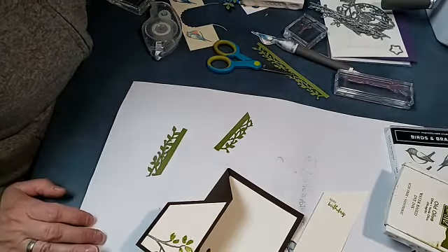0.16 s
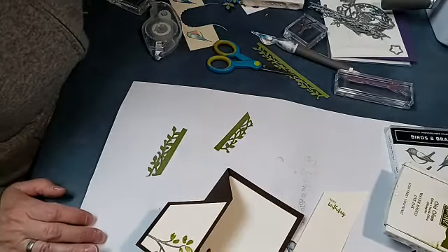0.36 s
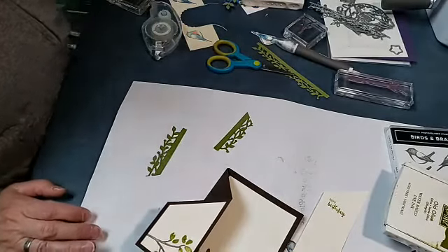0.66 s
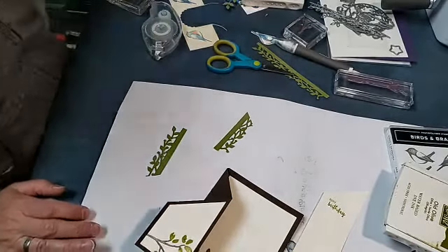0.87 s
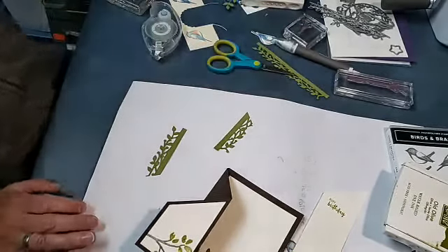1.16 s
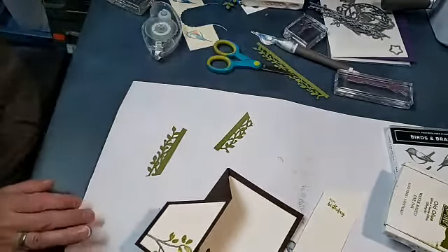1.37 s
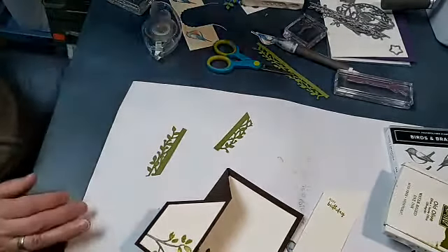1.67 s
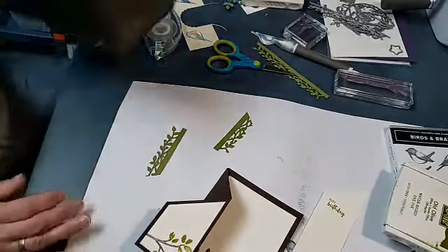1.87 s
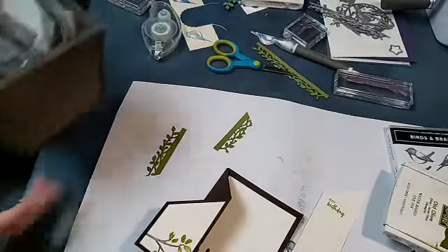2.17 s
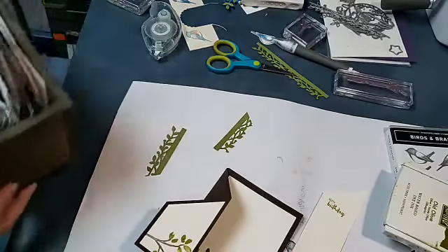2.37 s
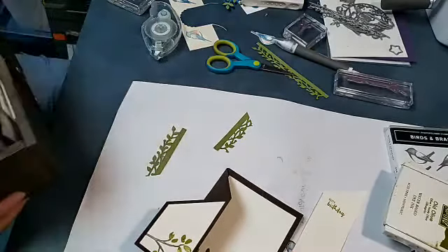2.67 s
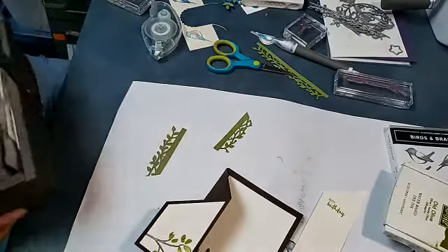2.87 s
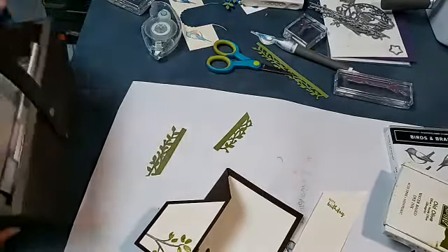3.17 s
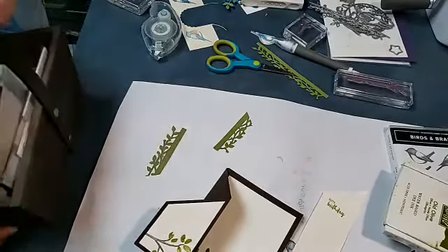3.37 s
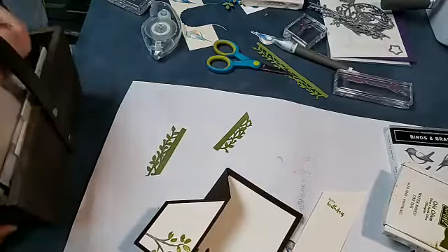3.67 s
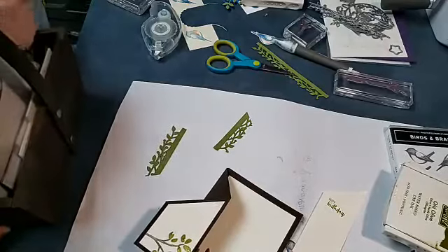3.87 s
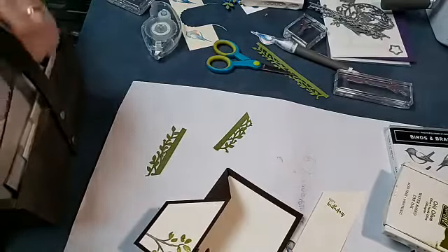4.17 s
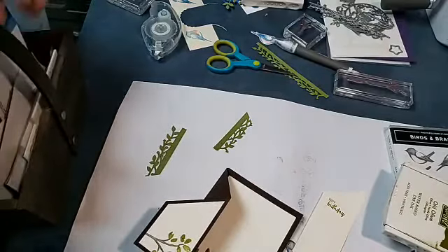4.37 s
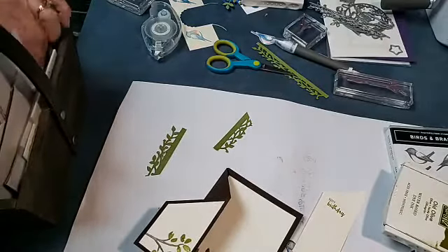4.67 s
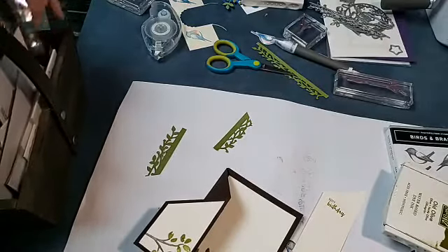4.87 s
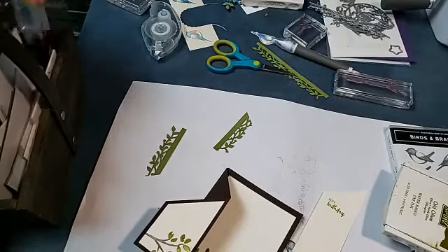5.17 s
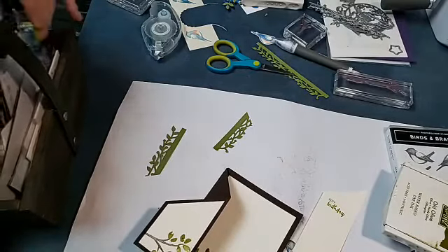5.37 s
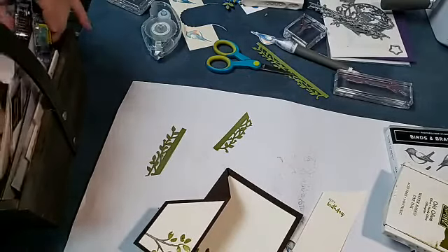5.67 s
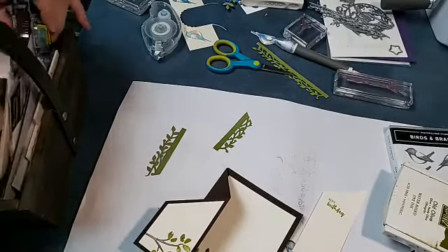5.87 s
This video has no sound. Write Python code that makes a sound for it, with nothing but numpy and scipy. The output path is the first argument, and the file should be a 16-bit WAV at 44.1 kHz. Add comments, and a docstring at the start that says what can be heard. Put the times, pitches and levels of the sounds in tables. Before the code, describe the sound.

In a quiet room, a drawer bangs closed, a handled box creaks and lands softly, and a hand sorts clicking plastic cases and rustling packets.

```python
"""Craft table in a small quiet room, one close microphone, over faint hiss and a low wavering rumble.
A drawer scrapes in and bumps shut; a storage box creaks, ticks at its handle and is set down with thuds.
A hand rummages in it: plastic clicks, knocks on the hollow box, rustling paper packets, dragged edges.
Blows are noise bursts plus damped sines, booms are single low modes with a brief rumble,
rustle is crackle over a smooth rub, scrapes are noise grains through resonances."""
import sys
import numpy as np
from scipy import signal
from scipy.fft import rfft, irfft, next_fast_len
from scipy.io import wavfile
from scipy.ndimage import map_coordinates

SR = 44100
rng = np.random.default_rng(int(sys.argv[2]) if len(sys.argv) > 2 else 0)


def master(y):
    """Save y as 16-bit WAV."""
    cut = np.clip(np.atleast_2d(y).T, -1, 1)
    pcm = np.round(cut * 32767)  # scale
    wavfile.write(sys.argv[1], SR, pcm.astype(np.int16))


N = 265702
TIME = np.arange(N) / SR


def amp(db):
    """Decibels to gain."""
    return 10 ** (np.asarray(db) / 20)


def unit(x):
    """Scale to an rms of one."""
    return x / np.sqrt(np.mean(x ** 2) + 1e-20)


def read(points, hz):
    """Interpolate a (Hz, value) table on a log-frequency axis."""
    table_hz, value = np.transpose(points)
    return np.interp(np.log(hz + 1), np.log(table_hz + 1), value)


def add(mix, start_s, sound):
    """Mix a sound in at a time."""
    part = mix[max(round(start_s * SR), 0):][:len(sound)]
    part += sound[:len(part)]


def colour(x, points, size=2048):
    """Minimum-phase filter with the given spectrum: attacks stay sharp."""
    log_gain = np.log(amp(read(points, abs(np.fft.fftfreq(size, 1 / SR)))))
    taps = np.fft.ifft(np.exp(np.conj(signal.hilbert(log_gain)))).real
    return signal.oaconvolve(x, taps[:size // 2])[:len(x)]


def registers(x):
    """Split into bass (170-1000 Hz), middle (1-5 kHz) and treble (above 5 kHz)."""
    size = next_fast_len(len(x) + SR // 20)
    hz = np.fft.rfftfreq(size, 1 / SR) + 1
    above_170, above_1000, above_5000 = (1 / (1 + (edge_hz / hz) ** 4) for edge_hz in (170, 1000, 5000))
    bands = np.array([above_170 - above_1000, above_1000 - above_5000, above_5000])
    return irfft(rfft(x, size) * bands, size)[:, :len(x)]


def register_levels(level_db, weight_db, sharp_db):
    """Gains of bass, middle, treble; weight and sharpness are relative to the middle."""
    return amp(level_db + np.array([weight_db, 0, sharp_db]))


def resonate(x, hz, width_hz):
    """Resonance of gain one; its frequency may follow a curve."""
    turn = np.exp(2j * np.pi * np.cumsum(hz * np.ones(len(x))) / SR)
    pole = np.exp(-np.pi * width_hz / SR)
    return 2 * (turn * signal.lfilter([1 - pole], [1, -pole], x / turn)).real


def resonate_twice(x, hz, width_hz):
    """Two equal resonances in series: steeper skirts."""
    return resonate(resonate(x, hz, width_hz), hz, width_hz)


def ring(modes, t, detune):
    """Damped sines, randomly detuned: each blow lands elsewhere."""
    shift, phase = rng.standard_normal(len(modes)), rng.random(len(modes))
    return sum(amp(db - 60 * t / t60_s) * np.sin(2 * np.pi * (hz * (1 + detune * k) * t + p))
               for (hz, db, t60_s), k, p in zip(modes, shift, phase))


def blows(rows, modes, spectrum, t60_s, alike, ring_db, crack_db, crack_s, rise_s, detune):
    """Each blow: a brief crack, a decaying wash of dense modes, and a few ringing modes."""
    out, t = np.zeros(N), np.arange(SR // 4) / SR
    head = slice(SR // 100)  # levels refer to the first 10 ms
    fade = amp(-60 * t / t60_s) + amp(crack_db) * np.exp(-t / crack_s)
    onset = 1 - np.exp(-t / rise_s)
    # alike: 0 = every blow differs, 1 = all identical
    shared_noise, shared_tones = rng.standard_normal(len(t)), ring(modes, t, detune)
    for start_s, level_db, weight_db, sharp_db in rows:
        noise = np.sqrt(alike) * shared_noise + np.sqrt(1 - alike) * rng.standard_normal(len(t))
        dense = colour(noise * fade, spectrum)
        tones = alike * shared_tones + (1 - alike) * ring(modes, t, detune)
        hit = (dense / dense[head].std() + amp(ring_db) * tones / tones[head].std()) * onset
        # heavy contact brings out the bass, hard contact the treble
        parts = registers(hit)
        gains = register_levels(level_db, weight_db, sharp_db) / parts[:, head].std(axis=1)
        add(out, start_s, gains @ parts)
    return out


def slips(rows, weight_db, sharp_db, brighten):
    """Rows for blows from one joint: weaker is duller, by brighten dB of treble per dB of level."""
    hardest_db = max(level_db for start_s, level_db in rows)
    return [(start_s, level_db, weight_db, sharp_db + brighten * (level_db - hardest_db))
            for start_s, level_db in rows]


def low_modes(rows, cycles, slope, rise_s, clatter_db, clatter_t60_s):
    """A struck panel's low mode swells and dies, over a brief rumble of its neighbours."""
    out, t = np.zeros(N), np.arange(SR // 2) / SR
    onset = np.sin(np.pi / 2 * np.minimum(t / rise_s, 1)) ** 2
    for start_s, peak_db, hz in rows:
        t60_s = cycles * (hz / 100) ** slope / hz  # cycles: t60 in periods at 100 Hz
        mode = amp(-60 * np.maximum(t - rise_s, 0) / t60_s) * np.sin(2 * np.pi * hz * t)
        rumble = unit(resonate_twice(rng.standard_normal(len(t)), hz, hz))
        clatter = rumble * amp(clatter_db - 60 * t / min(clatter_t60_s, 2 * t60_s))
        add(out, start_s, amp(peak_db) * onset * (mode + clatter))
    return out


# still-room hiss, relative spectrum: hz [Hz], density_db [dB per Hz]
HISS_SPECTRUM = [(20, -13), (45, -12.5), (65, -17.5), (110, -11), (250, -24), (500, -39.5), (2000, -38),
                 (4000, -43), (7500, -48.5), (10000, -49.5), (12000, -38.5)]
HISS_DB = -70.5
RUMBLE_HZ, RUMBLE_WIDTH_HZ, RUMBLE_DB = 59.5, 22, -61


def air():
    """Faint hiss plus narrow-band noise: the room's wavering rumble."""
    hz = np.fft.rfftfreq(N, 1 / SR)
    hiss = irfft(rfft(rng.standard_normal(N)) * amp(read(HISS_SPECTRUM, hz)), N)
    rumble = irfft(rfft(rng.standard_normal(N)) / (1 + ((hz - RUMBLE_HZ) / RUMBLE_WIDTH_HZ) ** 4), N)
    return amp(HISS_DB) * unit(hiss) + amp(RUMBLE_DB) * unit(rumble)


STROKE_RISE_SHARE = 0.46  # share of the length spent swelling
STROKE_FADE_DB, STROKE_ROUNDNESS = 17, 1.56  # drop at both ends; 1 = pointed top


def swell(peak_s, length_s):
    """One hand movement: builds up, fades a little more slowly."""
    rising, falling = (peak_s - TIME) / STROKE_RISE_SHARE, (TIME - peak_s) / (1 - STROKE_RISE_SHARE)
    away = np.maximum(rising, falling) / length_s
    return amp(-STROKE_FADE_DB * np.minimum(away, 10) ** STROKE_ROUNDNESS)


# hand strokes over paper and packets:
# peak_s [s], length_s [s], level_db [dB at 1-5 kHz], weight_db [dB], sharp_db [dB]
PAPER_STROKES = [(0.032, 0.18, -52, -7, 0), (0.169, 0.039, -57, 6, 4), (0.263, 0.35, -58.5, 0, -1),
                 (0.698, 0.27, -60.5, 3.5, -4), (2.313, 0.2, -76, -16.5, 9.5), (2.68, 0.18, -70, -4.5, 9),
                 (2.848, 0.11, -73, -19, 8.5), (3.045, 0.13, -69.5, -14.5, 0), (3.129, 0.068, -60, -12, 3),
                 (3.367, 0.088, -49, -3, -3), (3.443, 0.27, -58, 1.5, -7.5), (3.519, 0.058, -49, -1, -6.5),
                 (3.639, 0.15, -61.5, -2, 6.5), (3.735, 0.15, -53, -2.5, 4.5), (3.82, 0.24, -49.5, 1.5, -8),
                 (3.938, 0.12, -42, -3.5, -4), (4.05, 0.15, -62, -4.5, -4), (4.181, 0.23, -65.5, -8, 11),
                 (4.245, 0.19, -57.5, 3, -9.5), (4.609, 0.18, -54.5, -3, -5), (4.673, 0.05, -52.5, -6, 5.5),
                 (4.793, 0.17, -42, -5, -7.5), (5.0, 0.36, -69.5, -24.5, 2), (5.293, 0.12, -63, -9.5, 4),
                 (5.392, 0.15, -53.5, -6, -7), (5.602, 0.45, -63.5, 3.5, -6),
                 (5.69, 0.098, -48.5, -2, -6.5)]
HELD_FROM_S, HELD_DB, HELD_SHARP_DB = 2.2, -88, 9  # contents stir faintly once the box is lifted


def effort():
    """Bass, middle and treble levels: stroke powers add over the faint stir."""
    power = np.outer(register_levels(HELD_DB, 0, HELD_SHARP_DB) ** 2, TIME > HELD_FROM_S)
    for peak_s, length_s, level_db, weight_db, sharp_db in PAPER_STROKES:
        stroke_power = register_levels(level_db, weight_db, sharp_db) ** 2
        power += np.outer(stroke_power, swell(peak_s, length_s) ** 2)
    return np.sqrt(power)


# paper snap and rub, relative spectrum: hz [Hz], density_db [dB per Hz]
PAPER_SPECTRUM = [(100, 6), (330, -9), (520, -3), (900, -6), (1600, -2.5), (3100, -8), (4100, -6.5),
                  (6000, -8), (10000, -13.5), (15000, -8.5)]
# ringing modes of the hollow box: hz [Hz], level_db [dB], t60_s [s]
BOX_RINGS = [(469.2, -1, .07), (555.2, -0.5, 0.11), (798, -6, 0.1), (1127, 5.5, 0.035), (1573, 0.5, 0.062),
             (1803, 1, 0.038), (2100, -2.5, 0.051), (2750, -23.5, .06), (3650, -6, 0.011)]


def crackle(slips_per_s=750, spread_db=4.0, clump_db=7, clump_s=.025, snap_t60_s=0.026,
            box_db=-10, detune=.07, edges=14):
    """Packet edges slip in clumps; each has its own snap and rings the box a little."""
    out, t, knots = np.zeros(N), TIME[:SR // 12], np.arange(1024)
    for _ in range(edges):
        clumps = amp(clump_db * np.clip(rng.standard_normal(len(knots)), -2, 2))
        busy = np.interp(TIME / clump_s, knots, clumps)
        slipping = rng.random(N) < busy / busy.mean() * slips_per_s / edges / SR
        sizes = amp(spread_db * np.minimum(rng.exponential(1, N), 3)) * rng.choice([-1, 1], N)
        snap = colour(rng.standard_normal(len(t)) * amp(-60 * t / snap_t60_s), PAPER_SPECTRUM)
        edge = unit(snap) + amp(box_db) * unit(ring(BOX_RINGS, t, detune))
        out += signal.oaconvolve(slipping * sizes, edge)[:N]
    return unit(out)


def shifting(x, patchy_db=4, patch_s=.022, even_hz=4500, count=48):
    """Resonances come and go as the things touched change; in the treble they even out."""
    hz, t, z = signal.stft(x, SR, nperseg=256)
    band = np.log1p(hz / 1000) / np.log1p(hz[-1] / 1000) * count
    grid = np.meshgrid(band, t / patch_s, indexing="ij")
    random_map = rng.standard_normal((count + 1, 1024))
    patches = unit(map_coordinates(random_map, grid, order=1, mode="nearest"))
    gain = amp(patchy_db * patches / np.hypot(1, hz / even_hz)[:, None])
    level_gain = gain / np.sqrt(np.mean(gain ** 2, axis=0))
    return signal.istft(z * level_gain, SR, nperseg=256)[1][:N]


def rustle(rub_db=-9):
    """Crackle over a smooth rub, each register following the hand's effort."""
    rub = unit(colour(rng.standard_normal(N), PAPER_SPECTRUM))
    parts = registers(shifting(crackle() + amp(rub_db) * rub))
    return sum(unit(part) * level for part, level in zip(parts, effort()))


# plastic cases touching: start_s [s], level_db [dB at 1-5 kHz], sharp_db [dB]
CASE_CLICKS = [(0.0535, -38, -5), (0.067, -60, -21), (0.158, -52, 8), (0.163, -40.5, 8), (0.173, -49.5, 3),
               (3.451, -52.5, -26), (3.903, -40.5, -2.5), (3.924, -43.5, 1), (3.934, -36, -1),
               (3.942, -36.5, -9), (3.96, -43, -4), (4.133, -53, -16), (4.275, -50.5, -13),
               (4.339, -62, -22), (4.513, -56.5, 17), (4.6279, -37, 1.5), (4.665, -46, -2),
               (4.7241, -42, -6.5), (4.9335, -53.5, -4.5), (4.979, -56.5, -7), (5.015, -55.5, -8),
               (5.0397, -55, -2.5), (5.304, -54.5, -5), (5.3323, -50, 0), (5.3468, -41.5, 1.5),
               (5.667, -38.5, -5.5)]
# ringing modes: hz [Hz], level_db [dB], t60_s [s]
CASE_RINGS = [(520, -2.5, .04), (1086, -2.5, 0.0243), (1585, -5, 0.047), (1940, -9, 0.057),
              (2214, -1.5, 0.0425), (2850, -0.5, 0.043), (4450, -2.5, 0.018), (4260, 10, 0.02),
              (5890, 2, 0.041)]
# dense damped modes, relative spectrum: hz [Hz], density_db [dB per Hz]
CASE_SPECTRUM = [(120, -39), (200, -6.5), (538, -9.5), (806, -24), (1250, -15.5), (1650, -5), (3560, -6.5),
                 (4200, -2.5), (6400, -12), (6880, 0), (9750, -6.5), (14900, -1.5), (16000, 0.5)]


def plastic_clicks(weight_db=-16.5):
    """Light stiff shells: little bass, short bright modes."""
    rows = [(start_s, level_db, weight_db, sharp_db) for start_s, level_db, sharp_db in CASE_CLICKS]
    return blows(rows, CASE_RINGS, CASE_SPECTRUM, t60_s=0.062, alike=0, ring_db=-7.5,
                 crack_db=-7.0, crack_s=0.007, rise_s=0.00099, detune=0.0478)


# drawer on its runners: time_s [s], level_db [dB], scrape_hz [Hz]
DRAWER_SLIDE = [(.32, -74, 640), (.36, -58, 714), (.42, -55.5, 890), (.47, -52.5, 950), (0.494, -44.5, 910),
                (.508, -35, 880), (.528, -33.5, 980), (.54, -62, 912)]


def slide(width_hz=430, grain_per_s=260, upper_ratio=2.3, upper_db=-11):
    """Runners catch and slip in two broad resonances that mostly rise as the drawer gathers speed."""
    time_s, level_db, scrape_hz = np.transpose(DRAWER_SLIDE)
    pitch_hz = np.interp(TIME, time_s, scrape_hz)
    drive = rng.standard_normal(N) * (0.14 + (rng.random(N) < grain_per_s / SR))
    main = unit(resonate_twice(drive, pitch_hz, width_hz))
    upper = unit(resonate_twice(drive, upper_ratio * pitch_hz, upper_ratio * width_hz))
    moving = (TIME > time_s[0]) * (TIME < time_s[-1])
    return (main + amp(upper_db) * upper) * amp(np.interp(TIME, time_s, level_db)) * moving


# drawer catches on its runners, hits its stop, bounces:
# start_s [s], level_db [dB at 1-5 kHz], weight_db [dB], sharp_db [dB]
DRAWER_BLOWS = [(0.338, -55, 11.5, -12), (0.377, -65.5, 11, -13), (0.401, -63.5, 15.5, 2),
                (0.437, -50.5, 2, 5), (0.5303, -39.5, 11, 7), (0.557, -31, 6, 1.5), (0.571, -38, -9, -15),
                (0.579, -47, 6, -2), (0.6625, -51, -3, -1), (0.673, -37, -6, -3), (0.7243, -47, 6, 2.5),
                (0.7325, -44, 6.5, -7)]
# ringing modes: hz [Hz], level_db [dB], t60_s [s]
DRAWER_RINGS = [(400, -7, .06), (520, -4, .05), (825, -2, .045), (885, -2, .04), (1140, -9, .05),
                (1416, -12, .07), (1850, -11, .05), (2439, -8, .06)]
# dense damped modes, relative spectrum: hz [Hz], density_db [dB per Hz]
DRAWER_SPECTRUM = [(88, -37), (150, -4), (524, -14), (702, -5), (888, 2.5), (1060, -11), (1760, -15.5),
                   (2550, -16.5), (8230, -33), (12400, -29), (16000, -28.5)]


def drawer_knocks():
    """Drawer against runners and stop: heavy, short-ringing blows."""
    return blows(DRAWER_BLOWS, DRAWER_RINGS, DRAWER_SPECTRUM, t60_s=0.073, alike=0.14, ring_db=-3.0,
                 crack_db=-4.5, crack_s=0.001, rise_s=0.00066, detune=0.013)


# panels set booming by heavy blows: start_s [s], peak_db [dB], mode_hz [Hz]
PANEL_BOOMS = [(0.531, -23, 188.5), (0.5318, -22, 86.7), (0.533, -31.5, 271), (0.5575, -24, 870),
               (0.559, -28, 176), (0.56, -30.5, 71), (0.676, -29, 110.6), (0.7325, -30.5, 855),
               (4.8315, -26.5, 585), (5.459, -27.5, 474), (5.704, -28.5, 590)]


def booms():
    """Struck panels boom; stiffer, higher ones ring for more cycles."""
    return low_modes(PANEL_BOOMS, cycles=17.6, slope=0.39, rise_s=0.0025, clatter_db=-13, clatter_t60_s=0.087)


# box taking the strain: start_s [s], level_db [dB at 1-5 kHz]
BOX_CREAKS = [(1.4275, -65.5), (1.495, -73.5), (1.557, -58.5), (1.597, -59.5), (1.709, -57.5)]
# ringing modes: hz [Hz], level_db [dB], t60_s [s]
CREAK_RINGS = [(404, 6, 0.17), (853, 14, 0.062), (1050, 6, 0.082), (1290, -22, 0.057), (1579, 11.5, 0.077),
               (1734, 5, 0.039), (2260, 0, 0.07)]
# dense damped modes, relative spectrum: hz [Hz], density_db [dB per Hz]
CREAK_SPECTRUM = [(88, -9.5), (150, 6.5), (964, -16.5), (1120, -1.5), (1410, -14), (1580, -10.5),
                  (1870, -15.5), (4400, -30), (8390, -50), (14000, -60)]
RUN_START_S, RUN_GAP_S, RUN_DB, RUN_COUNT = 1.948, 0.0265, -56.5, 6


def creaks():
    """Stick-slip of the strained box: single slips, then one even run under a steady pull."""
    run = [(RUN_START_S + k * RUN_GAP_S, RUN_DB) for k in range(RUN_COUNT)]
    rows = slips(list(BOX_CREAKS) + run, weight_db=-0.5, sharp_db=-8, brighten=2)
    return blows(rows, CREAK_RINGS, CREAK_SPECTRUM, t60_s=0.19, alike=0.45, ring_db=-3.5,
                 crack_db=5.5, crack_s=0.0021, rise_s=0.0011, detune=0.0095)


# things knocking on the hollow box:
# start_s [s], level_db [dB at 1-5 kHz], weight_db [dB], sharp_db [dB]
BOX_BLOWS = [(1.778, -76.5, 15.5, -18.5), (3.737, -42.5, -10, -7), (3.7688, -29.5, -7.5, -14),
             (3.798, -34, -24, -13.5), (3.838, -45.5, -6, -5), (4.218, -52.5, -12, -24.5),
             (4.5724, -49, -17, -8.5), (4.598, -47, -8, -28), (4.759, -46, -2, -6), (4.777, -46, 5, -16),
             (4.784, -37, -30, -13), (4.805, -35.5, -26, -14), (4.8313, -33.5, -6.5, -18),
             (4.842, -41.5, -11, -9.5), (5.443, -44.5, -7, -9.5), (5.453, -37.5, -2.5, -17),
             (5.463, -48, -1, -26), (5.474, -49.5, 8, -14), (5.5781, -49, -14, -10.5),
             (5.598, -45.5, 5, -9.5), (5.7035, -32.5, -15.5, -10)]
# dense damped modes, relative spectrum: hz [Hz], density_db [dB per Hz]
BOX_SPECTRUM = [(120, -12.5), (200, -14.5), (334, -4), (558, -0.5), (916, -11.5), (1120, -4.5),
                (1320, -7.5), (1740, -4), (2380, -11), (3070, -15), (3970, -9.5), (6170, -21.5),
                (6880, -19.5), (16000, -26.5)]


def box_knocks():
    """Knocks excite the hollow box: strong ring, weak crack."""
    return blows(BOX_BLOWS, BOX_RINGS, BOX_SPECTRUM, t60_s=0.061, alike=0, ring_db=-1.5,
                 crack_db=-19.5, crack_s=0.0016, rise_s=0.00058, detune=0.016)


# handle as the box swings: start_s [s], level_db [dB at 1-5 kHz]
TICKS = [(2.179, -63.5), (2.2578, -52.5), (2.3505, -47.5), (2.429, -46.5), (2.5135, -46.5), (2.6345, -47.5)]
# ringing modes: hz [Hz], level_db [dB], t60_s [s]
HANDLE_RINGS = [(781, 4.5, 0.036), (840, -4.5, 0.047), (2050, 4, 0.053), (2116, 1.5, 0.034),
                (2536, 11, 0.027), (2800, -5, 0.15)]
# dense damped modes, relative spectrum: hz [Hz], density_db [dB per Hz]
HANDLE_SPECTRUM = [(180, -54), (300, -20), (645, -11), (814, -4), (1150, -15), (2070, -4), (4670, -11),
                   (4990, -6.5), (13500, -6), (16000, -10)]


def handle_ticks():
    """The handle joint slips at much the same spot: ticks sound alike."""
    rows = slips(TICKS, weight_db=-5, sharp_db=-10.5, brighten=0.48)
    return blows(rows, HANDLE_RINGS, HANDLE_SPECTRUM, t60_s=0.18, alike=0.67, ring_db=-3.5,
                 crack_db=-1, crack_s=0.0074, rise_s=0.00052, detune=0.0028)


# loaded box bumping, landing, rocking: start_s [s], peak_db [dB], mode_hz [Hz]
BOX_THUDS = [(2.985, -51.5, 176), (2.993, -42.5, 72), (3.3401, -29.5, 264), (3.349, -33.5, 134),
             (3.369, -31, 70.3), (3.411, -36.5, 133), (3.432, -36.5, 71.5), (3.48, -38, 66.4),
             (3.528, -43, 149), (5.729, -45.5, 70)]


def thuds():
    """Dull low modes of the loaded box, each dying in the same number of cycles."""
    return low_modes(BOX_THUDS, cycles=13, slope=0, rise_s=0.003, clatter_db=-7, clatter_t60_s=0.15)


# stiff edge along the box wall: peak_s [s], length_s [s], level_db [dB]
EDGE_DRAGS = [(3.776, 0.16, -44.5), (4.243, 0.088, -50.5), (4.587, 0.13, -56.5)]


def drags(wall_hz=1640, width_hz=380, catches_per_s=500):
    """Tiny catches of the edge sound one broad wall resonance."""
    catches = rng.standard_normal(N) * (rng.random(N) < catches_per_s / SR)
    rasp = unit(resonate_twice(catches, wall_hz, width_hz))
    return rasp * sum(amp(level_db) * swell(peak_s, length_s) for peak_s, length_s, level_db in EDGE_DRAGS)


# reverberation time: hz [Hz], t60_s [s]
ROOM_DECAY = [(100, 0.46), (500, 0.11), (2000, 0.11), (6000, 0.18), (15000, 0.27)]


def room(x, first_s=0.006, taps_per_s=3000, treble_db=-4):
    """Sparse reflections of a furnished room, each band with its own decay."""
    length = SR // 2
    taps = rng.choice([-1., 1.], length) * (rng.random(length) < taps_per_s / SR) * (TIME[:length] > first_s)
    hz, t, z = signal.stft(taps, SR, nperseg=256)
    tail = signal.istft(z * amp(-60 * t / read(ROOM_DECAY, hz)[:, None]), SR, nperseg=256)[1]
    wet = signal.fftconvolve(x, tail / np.linalg.norm(tail))[:N]
    return colour(wet, [(3000, 0.0032), (12000, treble_db)])


def scene(room_db=-14.5):
    """All the handling, its reflections, and the room's air."""
    dry = rustle() + plastic_clicks()
    dry += slide() + drawer_knocks() + booms()
    dry += creaks() + box_knocks() + handle_ticks()
    dry += thuds() + drags()
    return (dry + amp(room_db) * room(dry) + air())[None]


def record(dry, low_cut_hz=48, edge_hz=15950):
    """The microphone thins the deepest bass; then the band limit."""
    thin = signal.sosfilt(signal.butter(2, low_cut_hz, "high", fs=SR, output="sos"), dry)
    band_limit = signal.firwin(511, edge_hz, window=("kaiser", 9), fs=SR)
    return signal.oaconvolve(thin, band_limit[None], "same")


dry = scene()
out = record(dry)
master(out)
```